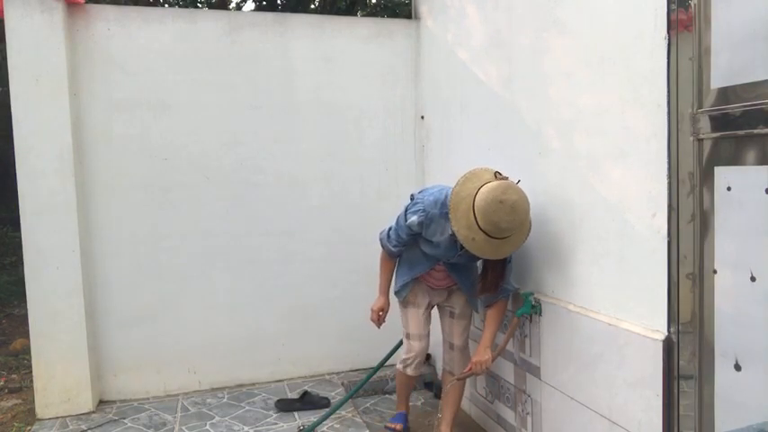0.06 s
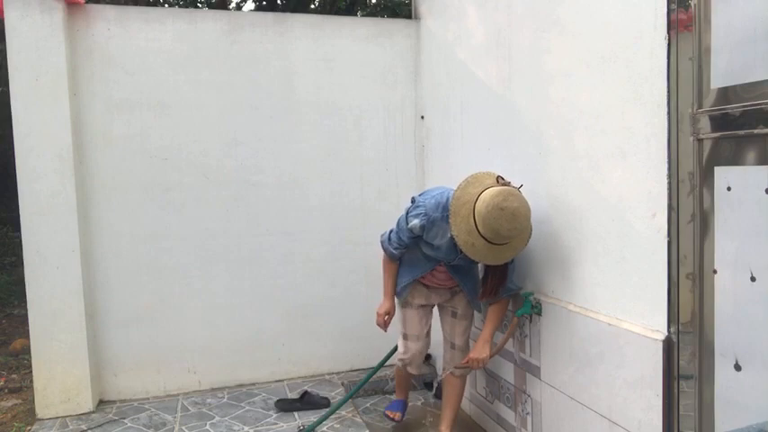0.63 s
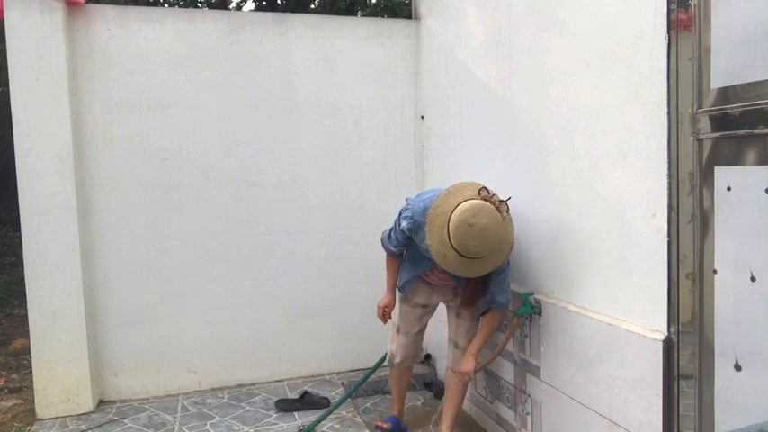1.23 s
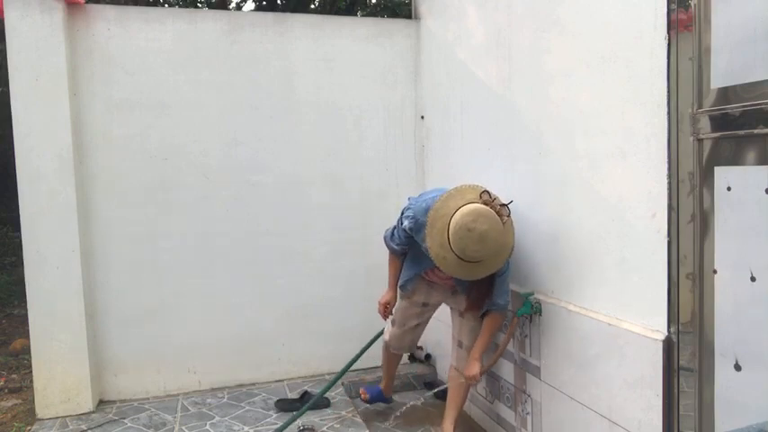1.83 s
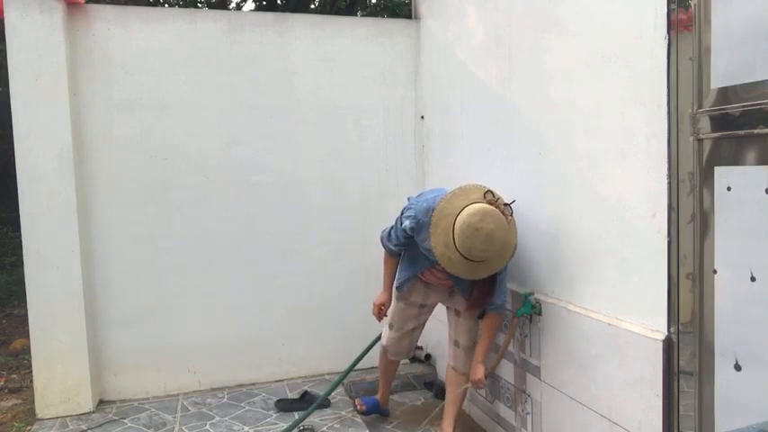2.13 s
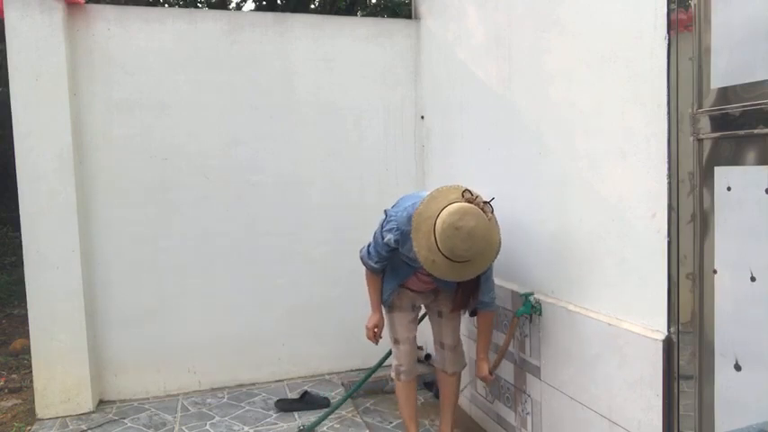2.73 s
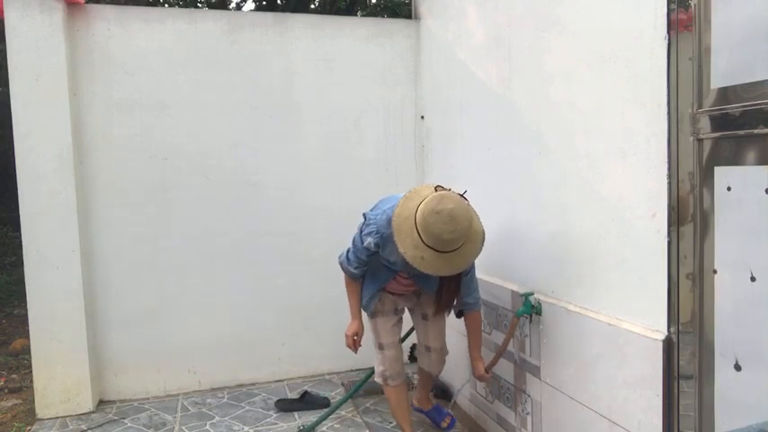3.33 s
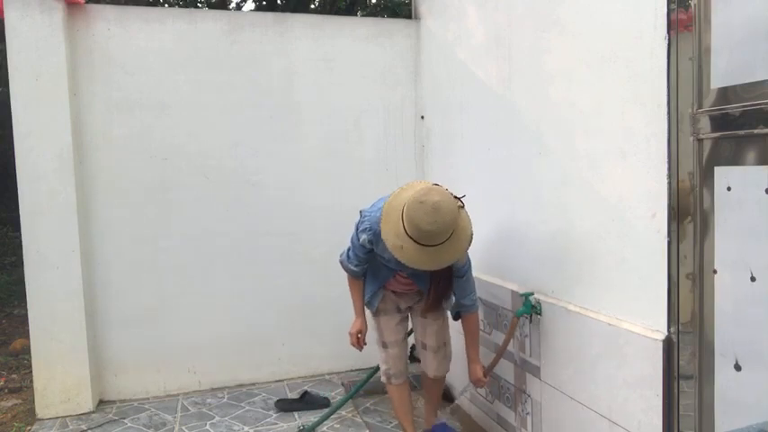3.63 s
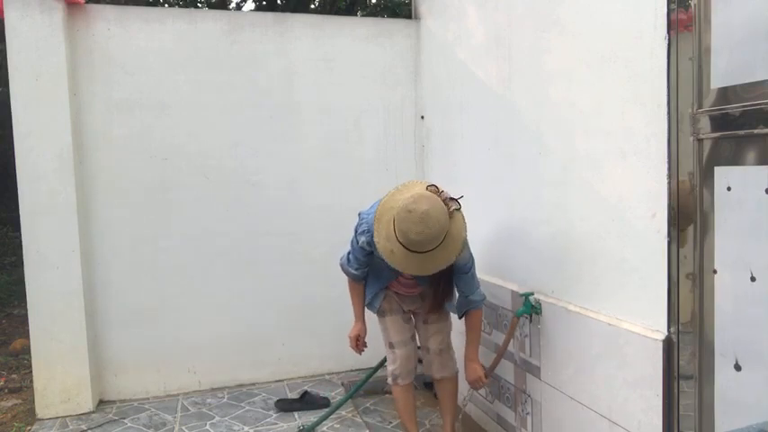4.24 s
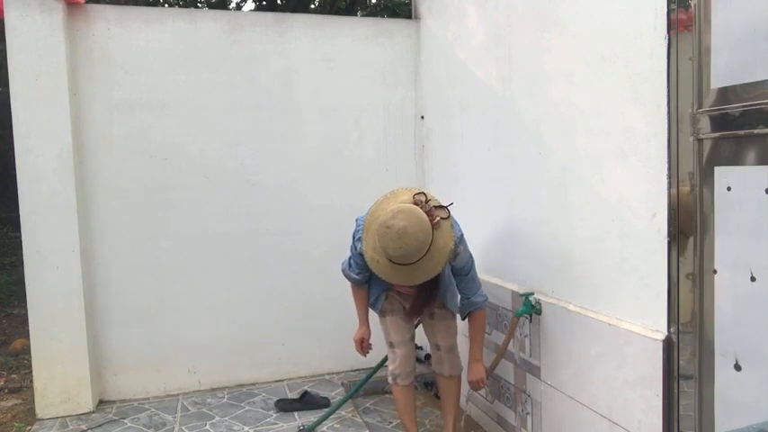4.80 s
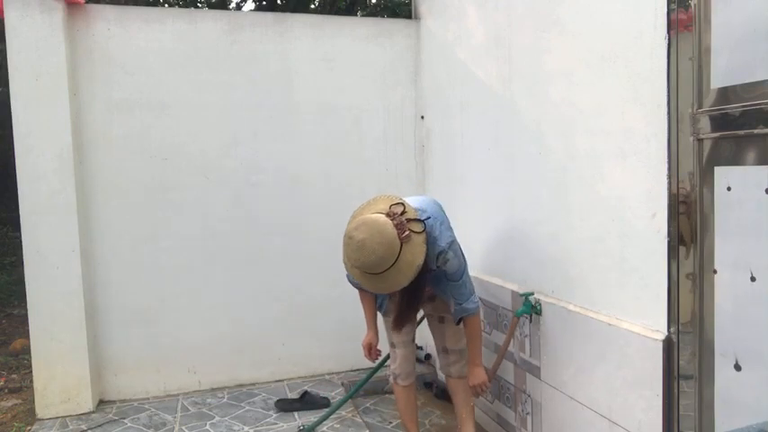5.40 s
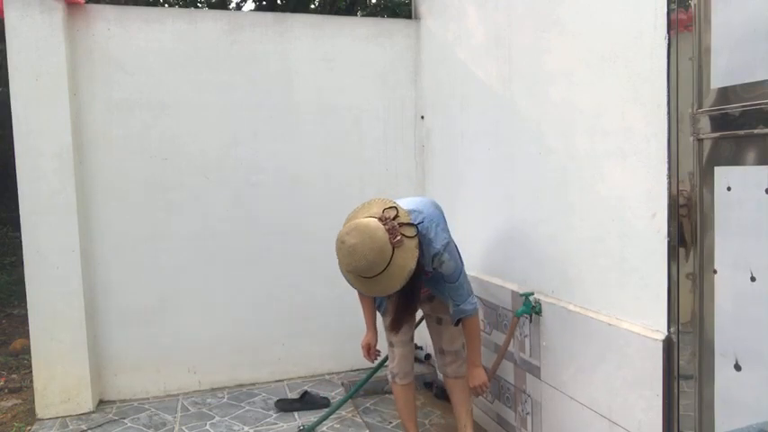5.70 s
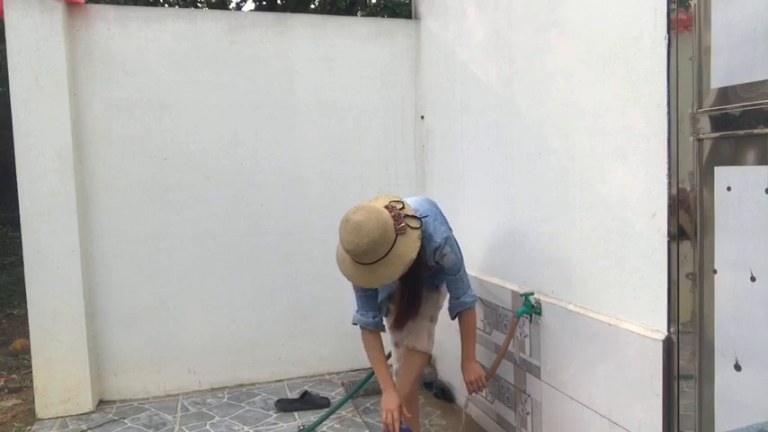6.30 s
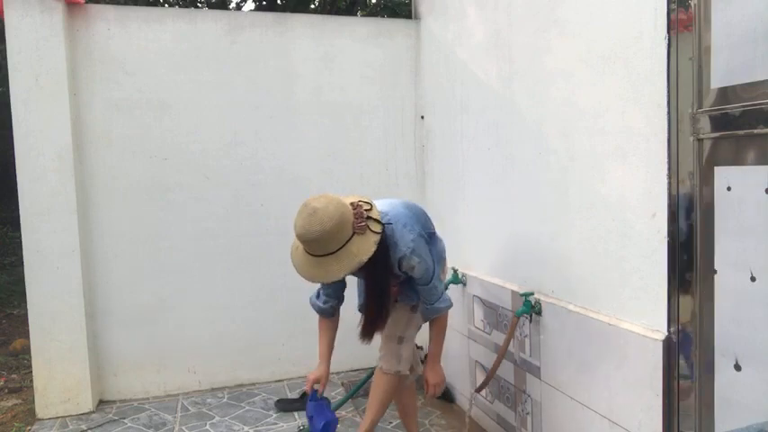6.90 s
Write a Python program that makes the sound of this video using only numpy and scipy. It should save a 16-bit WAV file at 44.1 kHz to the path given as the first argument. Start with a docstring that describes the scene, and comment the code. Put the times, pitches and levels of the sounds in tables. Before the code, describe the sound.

In a walled yard, a rubber sandal slaps quickly on wet tile, popping and squirting water near the microphone. Hose water trickles and spatters on, with stray drips and plinking bubbles. After a brief scuff and slosh comes a second, louder run of stamps, then only the running water remains in front. The walls add short echoes, while a low motor hum and faint insects sit in the background.

```python
"""Hose water running onto tiles in a walled corner of a yard, close to a single microphone.
The stream splashes in a puddle and spatters on bare tile; stray drops tick and their bubbles plink.
A rubber sandal stamps in two quick runs, popping trapped air and throwing up spray, and scuffs and
sloshes in between. The walls return short echoes. Farther off a motor hums, insects shrill and
a faint tone sounds once."""
import sys
import numpy as np
from scipy import signal
from scipy.fft import rfft, irfft
from scipy.io import wavfile

SR = 44100
rng = np.random.default_rng(int(sys.argv[2]) if len(sys.argv) > 2 else 0)


def file_out(sig):
    """Save sig as 16-bit WAV at sys.argv[1]."""
    # one column per channel
    cols = np.atleast_2d(sig).T
    # limit, then scale
    lim = np.clip(cols, -1, 1)
    pcm = np.round(lim * 32767).astype(np.int16)
    wavfile.write(sys.argv[1], SR, pcm)


N = 315315
TIME = np.arange(N) / SR

# The stream in the puddle and on bare tile, close by: time_s, level_db
PUDDLE_FLOW = [(0.0, -63), (0.38, -68), (1.19, -55.5), (1.31, -61.5), (1.53, -65), (1.89, -48), (2.13, -69),
               (2.57, -69.5), (3.07, -51.5), (3.19, -61), (3.4, -58.5), (3.56, -53.5), (3.94, -53.5),
               (4.38, -47.5), (4.72, -49), (5.02, -58), (5.4, -63.5), (6.09, -57), (6.43, -66.5),
               (7.15, -71)]
TILE_FLOW = [(0.0, -85), (0.14, -66.5), (0.3, -71), (0.52, -80), (0.65, -58), (0.96, -63), (1.35, -67),
             (1.55, -65), (1.77, -53.5), (1.89, -58.5), (2.15, -72), (2.33, -74), (2.53, -62.5),
             (3.66, -58), (4.02, -60.5), (4.82, -57), (5.0, -65), (5.99, -65), (6.19, -64.5), (6.57, -80),
             (6.99, -69.5), (7.15, -76)]
# Tone of the splash, spatter, squirts, wash and open air: frequency_hz, relative_db
SPLASH_SPECTRUM = [(300, -5), (700, -6.5), (1400, -0.5), (2200, -0.5), (3600, 0), (5000, -5), (8000, -26)]
SPATTER_SPECTRUM = [(2500, -13), (4500, -3.5), (6500, 6), (9000, 0), (10500, -4), (13000, 1.5),
                    (16000, -4.5)]
SQUIRT_SPECTRUM = [(100, -1.5), (300, -4.5), (750, -8), (1050, -3.5), (1500, -4.5), (2150, -2),
                   (2800, -3.5), (4500, -6.5), (6800, -10.5), (10000, -18.5), (16000, -20)]
WASH_SPECTRUM = [(150, -5), (280, 7), (800, 1), (2000, 7.5), (3500, -2), (6000, -6.5), (14000, -20)]
AIR_SPECTRUM = [(20, -20), (33, -24), (48, 0), (70, -0.5), (95, -4.5), (135, -5), (200, -15.5),
                (300, -15.5), (450, -22.5), (1500, -32.5), (5500, -48), (7600, -99), (10000, -47),
                (15500, -37)]
# Motor and insects in the distance: time_s, level_db
MOTOR_LEVELS = [(0, -57), (2.0, -62.5), (4.0, -58.5), (5.6, -57), (6.2, -54), (7.15, -53)]
INSECT_LEVELS = [(0, -74), (5.8, -74), (6.3, -77), (7.15, -65)]
# The sole lands, traps air, then squeezes water out: start_s, pop_db, pop_hz, squirt_delay_s,
# squirt_db, squirt_hold_s, squirt_treble_db, repeat_after_s
FOOTFALLS = [(0.001, -23, 1580, 0, -22, 0.0028, 8, 0.013),
             (0.222, -23.5, 1310, .012, -22, 0.0062, 5, 0.015),
             (0.478, -26, 1580, .016, -21.5, 0.0077, 1.5, 0.02),
             (0.736, -41, 1960, 0.015, -19.5, 0.0035, 6.5, 0.017),
             (0.997, -24, 1200, .009, -21.5, 0.0023, 7, .017),
             (3.428, -16, 1930, 0.0091, -22, 0.0023, 0, 0.025),
             (3.694, -13.5, 1840, 0.011, -27, 0.0029, 4, 0.0099),
             (3.959, -30, 1680, .021, -26.5, 0.0086, 0.5, 0.02),
             (4.221, -9.5, 1970, 0.033, -17, 0.0071, 0, 0.013),
             (4.506, -33, 1770, 0.0066, -19.5, 0.0058, -6.5, .02),
             (4.757, -9.5, 1940, 0.015, -17, 0.0047, 1, 0.027)]
# Resonances of the sole when stamped and when dragged: pitch_hz, width_hz, level_db
THUMP_MODES = [(276, 85, -0.5), (340, 49, -5.5), (417, 35, -3.5), (613, 19.6, -5.5)]
DRAG_MODES = [(1020, 500, -1), (1286, 570, 0), (3200, 2600, -7.5)]
# The largest bubbles in the puddle: start_s, level_db, pitch_hz
LARGE_BUBBLES = [(0.4005, -41.5, 1780), (1.469, -34.5, 4700), (2.0852, -32, 1820), (2.6749, -24.5, 3480),
                 (5.0644, -43, 1126), (5.1843, -31, 3000), (5.61, -35, 3760), (5.8586, -32, 3520),
                 (6.195, -32.5, 1370), (6.2804, -36, 2045), (6.3748, -38.5, 4420), (6.5968, -43, 4550)]
# The heaviest drops on tile: start_s, crack_db, snap_db
HEAVY_DROPS = [(0.8674, -61.5, -38), (1.2725, -29, -42), (1.7719, -32, -57), (1.9116, -33.5, -52),
               (2.0084, -25.5, -49), (2.2129, -64, -44.5), (2.305, -49, -36), (2.4733, -74, -43),
               (2.6744, -24, -57), (2.7129, -33, -42), (3.374, -32.5, -45), (4.8973, -39, -41.5),
               (5.1747, -36.5, -49), (5.469, -46, -58), (5.8044, -35.5, -57), (6.0506, -41, -50),
               (6.8838, -36.5, -40)]
# A faint tone, far off: time_s, level_db, pitch_hz
FAR_TONE = [(1.95, -79, 730), (2.08, -67.5, 728), (2.3, -67, 720), (2.48, -71, 696), (2.56, -86, 690)]
# The sole drags over wet tile: time_s, level_db
DRAG_LEVELS = [(2.55, -69), (2.575, -47.5), (2.595, -34), (2.615, -37.5), (2.635, -44.5), (2.68, -77)]
# The foot pushes water aside: time_s, wash_db, gurgle_db, gurgle_hz
FOOT_SWEEP = [(2.84, -97, -111, 450), (2.89, -52, -75, 468), (2.98, -53.5, -45, 526), (3.01, -53, -57, 585),
              (3.04, -53.5, -66, 564), (3.12, -55, -41.5, 617), (3.15, -59, -83, 710),
              (3.19, -46, -81, 663), (3.26, -85, -82, 723)]
# Reflections reaching the microphone off floor and near walls: delay_s, level_db
NEAR_ECHOES = [(.0043, -57), (.0093, -21.5), (0.0151, -17.5)]


def from_db(db):
    """Decibels to gain."""
    return 10 ** (np.asarray(db) / 20)


def unit_rms(x):
    """Scale to unit power."""
    return x / np.sqrt(np.mean(x ** 2) + 1e-20)


def curves(rows):
    """Each column after time_s, interpolated to every sample."""
    times, *columns = np.transpose(rows)
    return [np.interp(TIME, times, column) for column in columns]


def add(out, start_s, sound):
    """Mix a sound in at start_s."""
    start = max(0, round(start_s * SR))
    out[start:start + len(sound)] += sound[:N - start]


def decay(t, t60):
    """Amplitude that falls 60 dB in t60 seconds."""
    return np.exp(-np.log(1000) * t / t60)


def swell(t, peak_s):
    """A smooth rise to 1 at peak_s, then a fade."""
    return (t / peak_s * np.exp(1 - t / peak_s)) ** 2


def drift(per_s):
    """Random wander through per_s points a second; rms 1."""
    knots = rng.standard_normal(int(N / SR * per_s) + 2)
    return unit_rms(np.interp(TIME * per_s, np.arange(len(knots)), knots))


def filtered(x, order, hz, kind):
    """Butterworth filter."""
    return signal.sosfilt(signal.butter(order, hz, kind, fs=SR, output="sos"), x)


def coloured(x, spectrum, size=8192):
    """Minimum-phase filter with the given spectrum; white noise keeps its power."""
    hz, db = np.transpose(spectrum)
    bins_hz = np.fft.rfftfreq(size, 1 / SR)
    gain = unit_rms(from_db(np.interp(np.log(bins_hz + 1), np.log(hz), db)))
    cepstrum = irfft(np.log(gain))
    causal_fold = np.r_[1, np.full(size // 2 - 1, 2), np.zeros(size // 2)]
    response = irfft(np.exp(rfft(cepstrum * causal_fold)))
    return signal.fftconvolve(x, response)[:len(x)]


def resonance(x, hz, width_hz):
    """Two-pole resonance with gain 1 at its peak."""
    radius = np.exp(-np.pi * width_hz / SR)
    poles = [1, -2 * radius * np.cos(2 * np.pi * hz / SR), radius ** 2]
    return signal.lfilter(np.array([1, 0, -1]) * (1 - radius ** 2) / 2, poles, x + 1e-18)


def droplets(per_s, low_hz, high_hz, q, spread_db, pitches=24):
    """Random impacts of uneven size, each ringing briefly at one of a set of pitches; rms 1."""
    sizes = from_db(spread_db * np.minimum(rng.exponential(1, N), 4)) * rng.choice([-1, 1], N)
    impacts = sizes * (rng.random(N) < per_s / SR)
    pitch_index = rng.integers(0, pitches, N)
    return unit_rms(sum(resonance(impacts * (pitch_index == k), hz, hz / q)
                        for k, hz in enumerate(np.geomspace(low_hz, high_hz, pitches))))


def bubble(hz, cycles, rise):
    """A bubble rings down, rising in pitch as it nears the surface."""
    life_s = cycles / hz
    t = TIME[:int(life_s * SR) + 1]
    phase = 2 * np.pi * hz * t * (1 + rise * (t / life_s - .2))
    return np.sin(phase) * decay(t, life_s) * (1 - decay(t, 5 / hz))


def crack(hz, t60, q):
    """A drop bursts on tile; peak 1."""
    t = TIME[:SR // 20]
    burst = resonance(rng.standard_normal(len(t)) * decay(t, t60), hz, hz / q)
    return burst / np.abs(burst).max()


def scattered(sound_at, per_s, centre_hz, octaves, count, spread_db=2.5):
    """Separate drops or bubbles of random size at random moments; rms 1."""
    out = np.zeros(N)
    starts = np.cumsum(rng.exponential(1 / per_s, count))
    for start_s, (size, strength) in zip(starts, np.clip(rng.standard_normal((count, 2)), -2, 2)):
        sound = from_db(spread_db * strength) * sound_at(centre_hz * 2 ** (-octaves * size))
        if start_s < TIME[-1]:
            add(out, start_s, sound)
    return unit_rms(out)


def hose_water(usual_flow_db=-56):
    """The stream hits puddle and tile in uneven spurts, leaving small bubbles and stray drips."""
    puddle_db, tile_db = curves(PUDDLE_FLOW)[0], curves(TILE_FLOW)[0]
    spurts = drift(55)
    # A strong splash has more drops; a dribble falls in separate ones.
    density = from_db(np.clip(puddle_db - usual_flow_db, -10, 10))
    splash = droplets(per_s=1500 * density, low_hz=450, high_hz=6540, q=18.3, spread_db=3.5)
    splash = coloured(splash, SPLASH_SPECTRUM) * from_db(2.5 * spurts) / np.sqrt(density)
    spatter = droplets(per_s=3200 * density, low_hz=3440, high_hz=14830, q=13, spread_db=1)
    spatter = coloured(spatter, SPATTER_SPECTRUM) * from_db(4.64 * spurts) / np.sqrt(density)
    tinkle = scattered(lambda hz: bubble(hz, cycles=45, rise=0.04),
                       per_s=70, centre_hz=4820, octaves=0.524, count=1200)
    drips = scattered(lambda hz: crack(hz, t60=0.029, q=2.4),
                      per_s=16, centre_hz=4970, octaves=0.46, count=200)
    on_tile = from_db(6.5) * unit_rms(spatter) + from_db(-2) * tinkle + from_db(-1.5) * drips
    return from_db(puddle_db) * unit_rms(splash) + from_db(tile_db) * on_tile


def octave_tone(hz, octave_db):
    """A tone with its octave; rms 1."""
    phase = 2 * np.pi * np.cumsum(hz) / SR
    return unit_rms(np.sin(phase) + from_db(octave_db) * np.sin(2 * phase))


def motor(pitch_hz=118.1):
    """A distant motor hums, wavering a little in pitch and level."""
    level_db = curves(MOTOR_LEVELS)[0] + 0.82 * drift(2.8)
    return from_db(level_db) * octave_tone(pitch_hz * (1 + 0.0119 * drift(9)), octave_db=-19)


def insects(band_hz=(7000, 8050)):
    """Insects shrill in a thin band in the background."""
    shrill = filtered(rng.standard_normal(N), 2, band_hz, "band")
    return from_db(curves(INSECT_LEVELS)[0]) * unit_rms(shrill)


def open_air(level_db=-53.5):
    """Steady outdoor rumble and hiss."""
    return from_db(level_db) * coloured(rng.standard_normal(N), AIR_SPECTRUM)


def sole_ring(force, modes):
    """A force rings the resonances of the rubber sole."""
    return sum(from_db(db) * resonance(resonance(force, hz, width), hz, width) for hz, width, db in modes)


def stamps(pop_t60=0.0084, contact_t60=0.11, thump_db=-42, thud_db=-41, thud_hz=68):
    """Trapped air pops as the sole lands, the rubber thumps, and the leg's weight follows in a thud."""
    out, t = np.zeros(N), TIME[:SR // 3]
    thud = from_db(thud_db) * np.sin(2 * np.pi * thud_hz * t) * swell(t, peak_s=0.014)
    for start_s, pop_db, pop_hz, *_ in FOOTFALLS:
        upper = np.sin(2 * np.pi * pop_hz * t) * (1 - decay(t, 0.0028))
        lower = 0.21 * np.sin(2 * np.pi * 0.85 * pop_hz * t)
        pop = from_db(pop_db + 3.5) * (upper + lower) * decay(t, pop_t60)
        contact = rng.standard_normal(len(t)) * decay(t, contact_t60)   # the sole flattens unevenly
        thump = sole_ring(contact, THUMP_MODES)
        onset_rms = np.sqrt(np.mean(thump[:SR // 30] ** 2))
        add(out, start_s, pop + from_db(thump_db) * thump / onset_rms + thud)
    return out


def squirts(seep_db=-32.5, release_t60=0.018, crackle_db=7.5, low_cut_hz=210, treble_hz=2800):
    """Water seeps at the sole's rim, then squirts out, and a weaker burst sounds just after."""
    body, bright, t = np.zeros(N), np.zeros(N), TIME[:SR // 12]
    for land_s, _, _, delay_s, squirt_db, squirt_hold_s, treble_db, repeat_after_s in FOOTFALLS:
        seep = (land_s, seep_db, delay_s)
        squirt = (land_s + delay_s, squirt_db, squirt_hold_s)
        repeat = (land_s + delay_s + repeat_after_s, squirt_db - 7.5, 0.0013)
        for start_s, level_db, hold_s in (seep, squirt, repeat):
            signs = rng.choice([-1, 1], len(t))
            crackle = unit_rms(signs * from_db(crackle_db * rng.standard_normal(len(t))))
            burst = crackle * from_db(level_db - 2) * decay(np.maximum(t - hold_s, 0), release_t60)
            add(body, start_s, burst)
            add(bright, start_s, burst * (from_db(treble_db) - 1))   # each stamp's own brightness
    water = filtered(body, 2, low_cut_hz, "high") + filtered(bright, 1, treble_hz, "high")
    return coloured(water, SQUIRT_SPECTRUM)


def spray(flight_s=0.026, level_db=-52):
    """Water thrown up by a stamp rains back into the puddle a moment later."""
    shower = np.zeros(N)
    for start_s, *_ in FOOTFALLS:
        add(shower, start_s, swell(TIME[:SR // 2], flight_s))
    drops = droplets(per_s=570, low_hz=720, high_hz=3560, q=11, spread_db=5.5)
    return from_db(level_db) * shower * drops


def cavities(delay_s=0.075, spacing_s=0.0064, centre_hz=1325, octaves=0.16, level_db=-35.5):
    """The hollow each stamp leaves in the puddle closes in a quick cluster of three bubbles."""
    out = np.zeros(N)
    for land_s, *_ in FOOTFALLS:
        for k, (late, size) in enumerate(np.clip(rng.standard_normal((3, 2)), -2, 2)):
            ring = bubble(centre_hz * 2 ** (-octaves * size), cycles=24, rise=0.24)
            add(out, land_s + delay_s + spacing_s * (k + late / 2), from_db(level_db) * ring)
    return out


def plinks(splat_t60=0.052):
    """A large drop splats in the puddle and leaves a ringing bubble."""
    out, t = np.zeros(N), TIME[:SR // 8]
    for start_s, level_db, hz in LARGE_BUBBLES:
        splat = resonance(rng.standard_normal(len(t)), hz, 1.1 * hz) * decay(t, splat_t60)
        add(out, start_s, from_db(level_db - 9) * splat)
        add(out, start_s, from_db(level_db + 1.5) * bubble(hz, cycles=36, rise=0.15))
    return out


def ticks():
    """Heavy drops burst on the near tiles: a short crack with a bright snap on top."""
    out = np.zeros(N)
    for start_s, crack_db, snap_db in HEAVY_DROPS:
        body = from_db(crack_db + 1.5) * crack(hz=3600, t60=0.024, q=1.16)
        snap = from_db(snap_db + 5.5) * crack(hz=11000, t60=0.026, q=1.16)
        add(out, start_s, body + snap)
    return out


def far_tone():
    """One faint, quavering tone from far off, sinking slightly in pitch."""
    level_db, pitch_hz = curves(FAR_TONE)
    return from_db(level_db - 3) * octave_tone(pitch_hz * (1 + 0.0096 * drift(73)), octave_db=-5)


def scuff():
    """Rubber slips in quick uneven jerks that ring the hollow of the sole."""
    slips = rng.standard_normal(N) * from_db(4.4 * drift(400))
    return from_db(curves(DRAG_LEVELS)[0]) * unit_rms(sole_ring(slips, DRAG_MODES))


def slosh():
    """A sheet of water washes sideways while shrinking air pockets gurgle upward."""
    wash_db, gurgle_db, gurgle_hz = curves(FOOT_SWEEP)
    drops = droplets(per_s=6500, low_hz=232, high_hz=12200, q=15, spread_db=3.5)
    wash = unit_rms(coloured(drops, WASH_SPECTRUM))
    phase = 2 * np.pi * np.cumsum(gurgle_hz * (1 + 0.071 * drift(180))) / SR
    gurgle = unit_rms(np.sin(phase) * from_db(2.6 * drift(90)))
    return from_db(wash_db) * wash + from_db(gurgle_db - 5.5) * gurgle


def yard(direct, corner_db=-7, corner_t60=0.062, far_db=-9.5, far_t60=0.31, wall_cut_hz=11000, count=7):
    """Direct sound, hard echoes and quick scatter in the corner, then a tail from the farther walls."""
    t, out = TIME[:SR // 2], direct
    # The echo pattern switches every quarter second so that no pitch rings steadily.
    pattern = (TIME * 4 + 0.5).astype(int) % count
    for k in range(count):
        response = np.zeros(len(t))
        for level_db, t60 in [(corner_db, corner_t60), (far_db, far_t60)]:
            tail = rng.standard_normal(len(t)) * decay(t, t60) * (1 - decay(t, 0.0029))
            response += from_db(level_db) * tail / np.linalg.norm(tail)
        for delay_s, level_db in NEAR_ECHOES:
            response[round(delay_s * rng.normal(1, .03) * SR)] += from_db(level_db)
        response = filtered(response, 1, wall_cut_hz, "low")
        out = out + signal.oaconvolve(direct * (pattern == k), response)[:N]
    return out


def scene():
    """Water and sandal echo in the corner by the microphone; the background lies beyond."""
    near = hose_water() + stamps() + squirts() + spray()
    near += ticks() + plinks() + cavities() + scuff() + slosh()
    return (yard(near) + motor() + far_tone() + insects() + open_air())[None]


def record(dry, cutoff_hz=16000):
    """One microphone channel, its top cut steeply."""
    return signal.sosfilt(signal.ellip(10, .1, 80, cutoff_hz, fs=SR, output="sos"), dry)


dry = scene()
out = record(dry)
file_out(out)
```